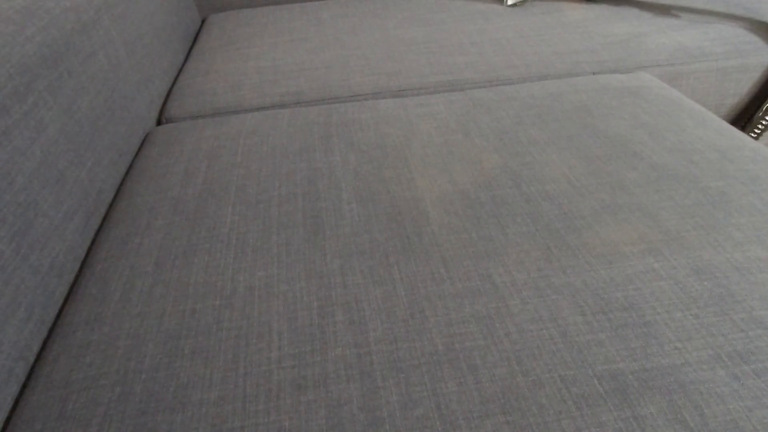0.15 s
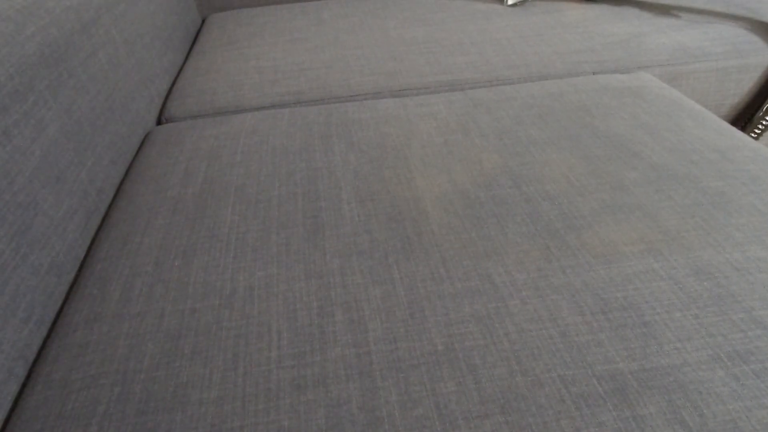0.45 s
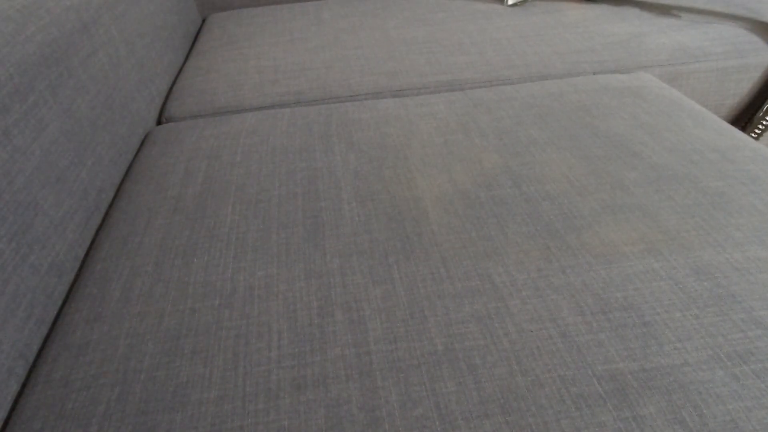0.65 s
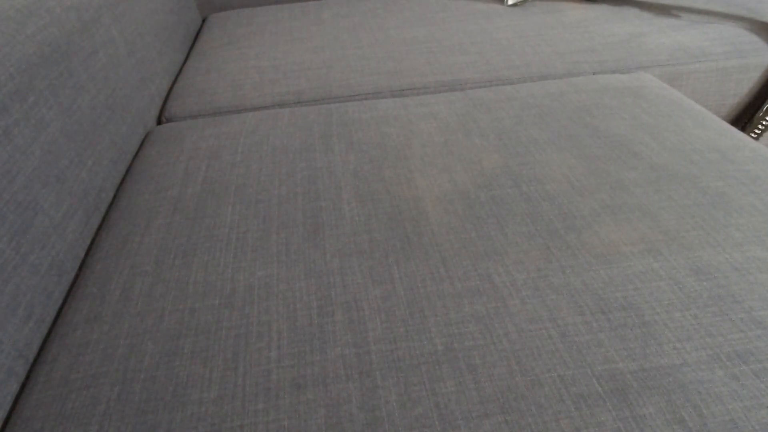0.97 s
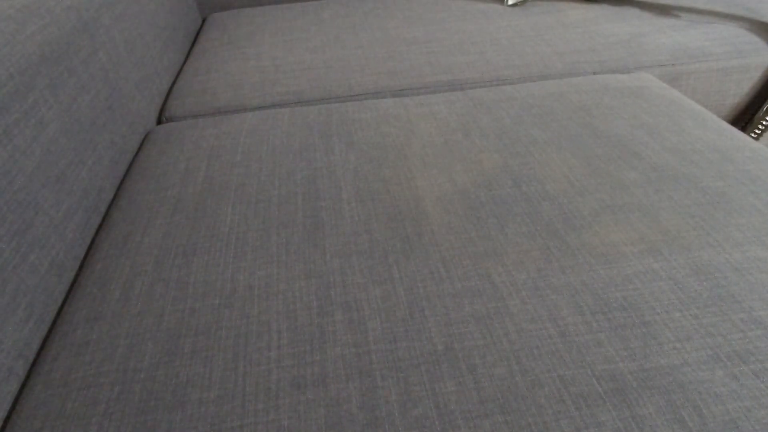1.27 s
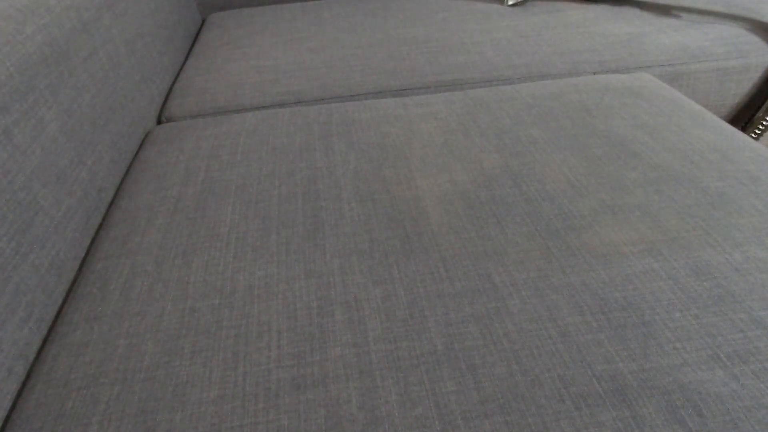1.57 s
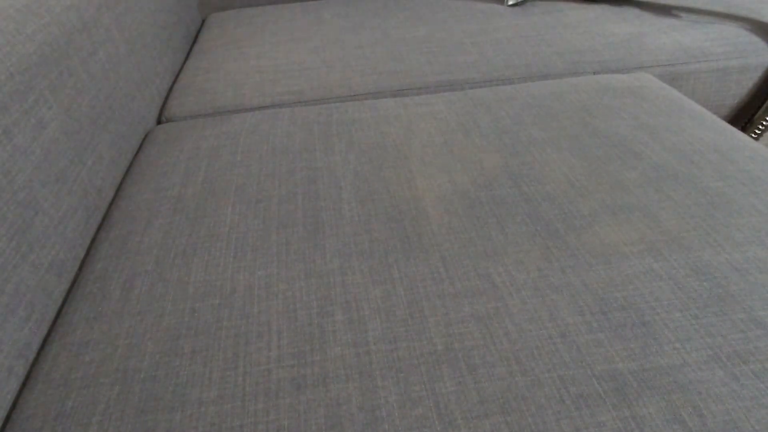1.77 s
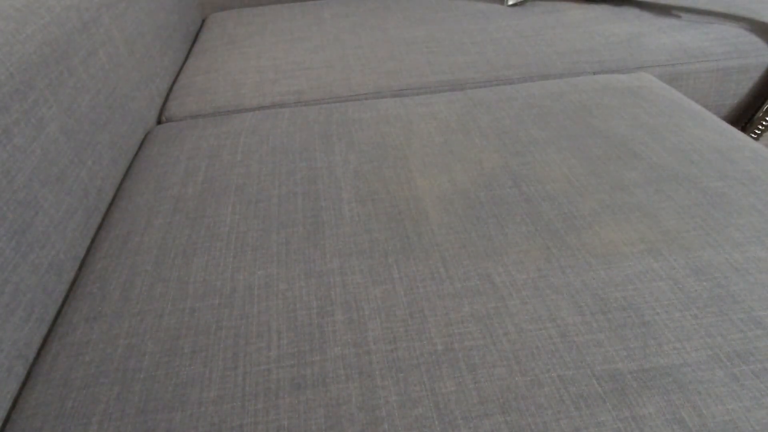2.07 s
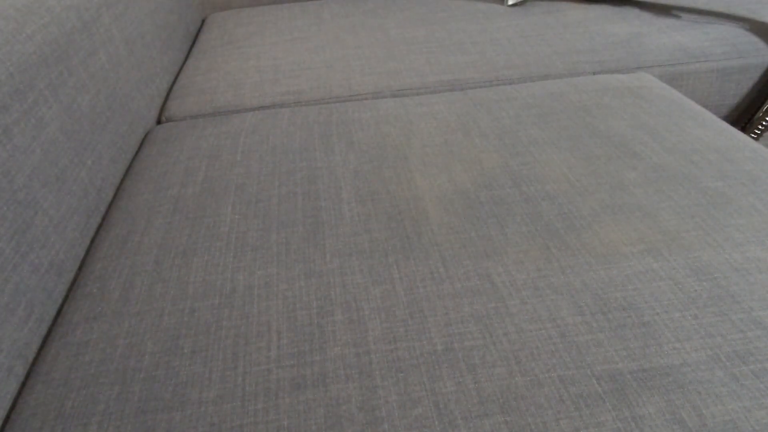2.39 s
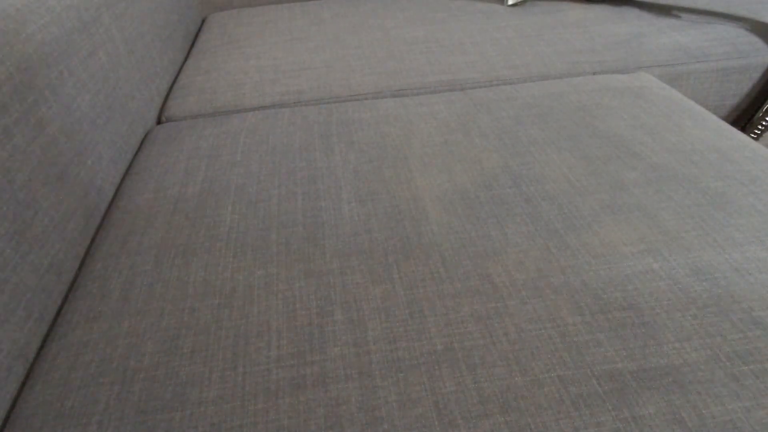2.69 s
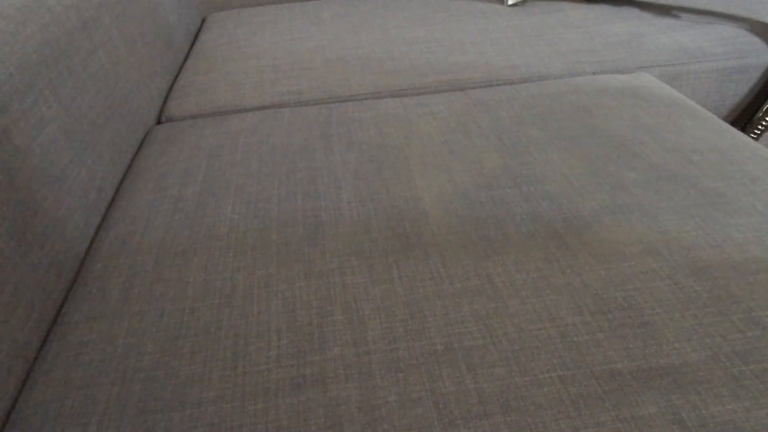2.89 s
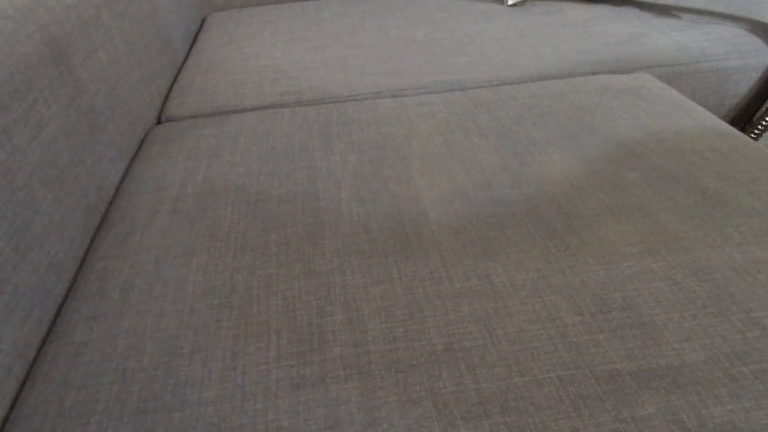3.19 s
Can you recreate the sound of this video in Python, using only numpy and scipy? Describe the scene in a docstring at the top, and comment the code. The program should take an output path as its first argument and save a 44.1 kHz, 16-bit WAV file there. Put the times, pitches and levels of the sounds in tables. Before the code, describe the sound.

An upholstery extraction vacuum runs close to the microphone in a furnished room; after brief silence it fades in, dips and dulls, then settles into a loud steady roar with a faint motor hum.

```python
"""Extractor motor in a furnished room

The vacuum motor of an upholstery extractor runs steadily, picked up as by one mono microphone, close
enough that the direct air noise stands well above the room. The shaft sings a clean tone: sines on
multiples of its speed. Turbulent air roars through housing, hose and room: noise in drifting patches,
coloured by resonances. After a short silence the sound fades in, dips and turns duller for a moment,
then settles at full level."""
import sys
import numpy as np
from scipy import signal
from scipy.fft import rfft, irfft
from scipy.io import wavfile
from scipy.ndimage import uniform_filter1d

SR = 44100
rng = np.random.default_rng(int(sys.argv[2]) if len(sys.argv) > 2 else 0)


def wav_out(sig):
    """Save sig, one row per channel (or a flat mono array), as 16-bit PCM at SR to the path in sys.argv[1]."""
    wavfile.write(sys.argv[1], SR, np.round(np.clip(np.atleast_2d(sig).T, -1, 1) * 32767).astype(np.int16))


def voltage_ratio(level):
    """Linear amplitude factor for a level in decibels (scalar or array-like)."""
    return 10 ** (np.asarray(level, float) / 20)


N = 147294

# Level at the microphone: t/s, overall level/dB,
# extra level of the air at 1.5-9.5 kHz/dB, extra level of the air below 400 Hz/dB
LEVEL = [(.123, -6.5, 0, -13), (.17, -9, -1, -9), (.28, -6.5, -1, -7), (.33, -8, -7.5, -13),
         (.4, -11.5, -3.5, -1), (.5, -10, -1, -2), (.62, -6, -0.2, -1), (.72, -2.5, -1.7, -1.5),
         (.82, 0.03, -0.6, -2), (1.5, 0.6, -0.16, -0.5), (2.3, 0.36, 0, -.5), (2.6, -0.03, -0.1, -2),
         (3.34, -0.9, 0.3, -.1)]
# Shaft tone, ahead of the overall level: t/s, level/dB
SHAFT_LEVEL = [(.1, -17.5), (.5, -17), (.87, -17), (1.0, -20), (1.35, -22.5), (1.45, -21.5), (1.56, -21.5),
               (1.72, -18), (2.1, -20.5), (2.33, -19), (2.45, -20), (2.65, -17), (3.05, -17), (3.2, -17.5),
               (3.34, -17)]
# Multiples of the shaft speed: 2-4 from imbalance, 9 and 18 from the nine fan blades, and a faint 10th: #
# multiple/1, level ahead of the overall level/dB, rms waver/dB
MULTIPLES = [(2, -42, 3), (3, -44.5, 2.5), (4, -40.5, 3), (9, -41.5, 2.5), (10, -51, 3), (18, -45, 4)]
# Turning speed of the shaft: t/s, f/Hz
SHAFT_SPEED = [(0, 567.45), (1.0, 567.48), (1.2, 567.65), (1.9, 567.62), (2.1, 567.42), (3.34, 567.43)]
# Broad colour of the rushing air, only its shape counts: f/Hz, relative level per Hz/dB
AIR_COLOUR = [(15, -70), (25, -51), (60, -32), (112, -28.5), (165, -21), (200, -19), (264, -21.5),
              (384, -20), (500, -15), (560, -18), (650, -12.5), (760, -17), (1000, -19), (1230, -13.5),
              (1500, -24.5), (2190, -23), (3400, -25), (4400, -27), (4700, -25), (8350, -26.5), (9500, -24),
              (11200, -22), (13000, -23), (15300, -28)]
# Low room modes and ringing of housing and hose: f/Hz, width/Hz, lift/dB
RINGS = [(79.5, 12, -1.5), (97, 13, 4.5), (148.3, 13.3, 13.5), (186.6, 16, 5.5), (210, 9.7, 6),
         (224, 12, 5), (302.5, 19, 11.5), (364, 9.5, 4.5), (434, 19.3, 9.5), (465, 14.3, 9.5), (516, 22, 6),
         (675, 15, 0.5), (1207, 9.5, 5.5), (1265, 17, 6), (1795, 6.3, 8.5), (1912, 11, 0.5), (1970, 13, 5),
         (2020, 12, 3.5), (2137, 14, 1), (2134, 16, 4.5), (2710, 25, 1.5), (4016, 280, 7), (4660, 30, 3.5),
         (5240, 60, -4), (5370, 77, 2.5), (7400, 170, 3), (10280, 230, 5), (10467, 34, 1), (10993, 120, 5),
         (11459, 71, 5.5), (11900, 50, 4), (13530, 260, 4.5)]

SHAFT_WAVER_DB, WAVER_TOP_HZ, PHASE_WANDER_RAD = 1.05, 12, 0.1  # rms, fastest waver, rms
AIR_DB = -16.5  # rms, ahead of the level table
PATCHY_DB, SWELL_DB, SWELL_TOP_HZ = 0.34, 0.31, 4.0  # rms, rms, fastest swell
ROOM_T60_S, ROOM_DB = 0.21, -11.5  # decay time, energy of the tail against the direct sound
START_S, FADE_IN_S = 0.1225, 0.036


def evened(x):
    """Scales to rms 1."""
    return x / np.sqrt(np.mean(x ** 2) + 1e-20)


def curve(table, t, column):
    """Reads one column of a time table, with straight lines between its rows."""
    columns = np.transpose(table)
    return np.interp(t, columns[0], columns[column])


def slow_chance(top_hz, t):
    """Slow random motion of rms 1: sines of random phase, the slower the stronger."""
    total = 0
    for f in np.geomspace(top_hz / 16, top_hz, 24):
        total = total + np.sin(2 * np.pi * (f * t + rng.random())) / np.sqrt(f)
    return evened(total)


def shaft_partial(multiple, angle, level_db, waver_db, wander_rad):
    """One sine locked to the shaft angle, wavering a little in level and phase."""
    t = np.arange(N) / SR
    coarse = t[::64]
    level_waver = np.interp(t, coarse, slow_chance(WAVER_TOP_HZ, coarse))
    phase_wander = np.interp(t, coarse, slow_chance(WAVER_TOP_HZ, coarse))
    phase = multiple * angle + 2 * np.pi * rng.random() + wander_rad * phase_wander
    return np.sqrt(2) * voltage_ratio(level_db + waver_db * level_waver) * np.sin(phase)


def motor():
    """Shaft tone and its multiples: every turn repeats the same push on the housing and the air."""
    t = np.arange(N) / SR
    angle = 2 * np.pi * np.cumsum(curve(SHAFT_SPEED, t, column=1)) / SR
    shaft_db = curve(SHAFT_LEVEL, t, column=1)
    tone = shaft_partial(1, angle, shaft_db, SHAFT_WAVER_DB, PHASE_WANDER_RAD * np.sqrt(0.82))
    for multiple, level_db, waver_db in MULTIPLES:
        wander_rad = PHASE_WANDER_RAD * np.sqrt(multiple)
        tone = tone + shaft_partial(multiple, angle, level_db, waver_db, wander_rad)
    return tone


def turbulence():
    """Random noise whose level drifts in patches of time and pitch and swells slowly as a whole."""
    size, hop = 1024, 256
    frames = N // hop + 5
    real, imaginary, patches = rng.standard_normal((frames, size // 2 + 1, 3)).T
    patches = uniform_filter1d(patches, size=10, axis=0)  # smooth over pitch
    patches = evened(uniform_filter1d(patches, size=14, axis=1))  # smooth over time
    swell = slow_chance(SWELL_TOP_HZ, np.arange(frames) * hop / SR)
    spectrum = (real + 1j * imaginary) * voltage_ratio(PATCHY_DB * patches + SWELL_DB * swell)
    return signal.istft(spectrum, nperseg=size, noverlap=size - hop)[1][:N]


def resonances(air):
    """Housing, hose and low room modes colour the air: a broad curve plus bell-shaped peaks and dips."""
    hz = np.fft.rfftfreq(N, 1 / SR)
    colour_hz, colour_level = np.transpose(AIR_COLOUR)
    colour_db = np.interp(np.log(hz + 1), np.log(colour_hz + 1), colour_level)
    for centre_hz, width_hz, lift_db in RINGS:
        colour_db = colour_db + lift_db / (1 + (2 * (hz - centre_hz) / width_hz) ** 2)
    return irfft(rfft(air) * voltage_ratio(colour_db), N)


def room(x):
    """Direct sound plus a decaying tail of sparse reflections, running since long before."""
    taps = np.zeros(SR // 2)
    slots = np.arange(100, len(taps) - 20, 20)  # one reflection at a random place in each
    taps[slots + rng.integers(0, 20, len(slots))] = rng.choice([-1., 1.], len(slots))
    taps = taps * voltage_ratio(-60 * np.arange(len(taps)) / SR / ROOM_T60_S)
    taps = voltage_ratio(ROOM_DB) * taps / np.linalg.norm(taps)
    taps[0] = 1  # direct sound
    # the product of spectra wraps the tail round, so the room already rings at the start
    return irfft(rfft(x) * rfft(taps, len(x)), len(x))


def roar():
    """Turbulent air through resonances and room; its middle treble and bass have levels of their own."""
    t = np.arange(N) / SR
    air = voltage_ratio(AIR_DB) * evened(room(resonances(turbulence())))
    middle_band = signal.butter(2, [1500, 9500], "band", fs=SR, output="sos")
    bass_band = signal.butter(2, 400, fs=SR, output="sos")
    middle = signal.sosfiltfilt(middle_band, air)
    bass = signal.sosfiltfilt(bass_band, air)
    middle_change = voltage_ratio(curve(LEVEL, t, column=2)) - 1
    bass_change = voltage_ratio(curve(LEVEL, t, column=3)) - 1
    return air + middle_change * middle + bass_change * bass


def scene():
    """Motor and air, the same in both channels."""
    return np.tile(motor() + roar(), (2, 1))


def top_cut(x):
    """Nothing passes above the cut-off."""
    return signal.sosfilt(signal.butter(12, 15210, fs=SR, output="sos"), x)


def record(dry):
    """Silence, a short fade-in, then the overall level at the microphone."""
    t = np.arange(N) / SR
    fade_in = np.clip((t - START_S) / FADE_IN_S, 0, 1)
    mix = dry * fade_in * voltage_ratio(curve(LEVEL, t, column=1))
    return top_cut(mix)


dry = scene()
out = record(dry)
wav_out(out)
```